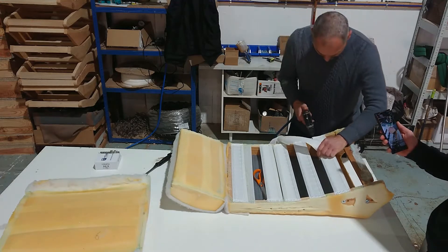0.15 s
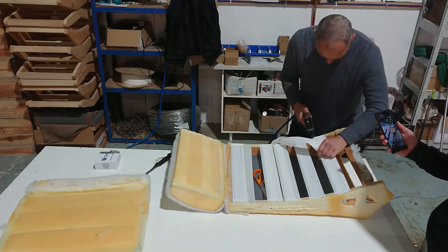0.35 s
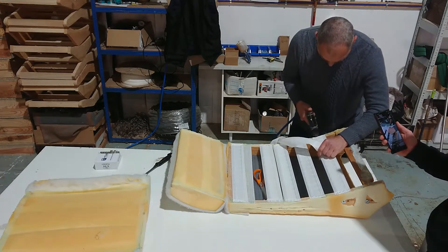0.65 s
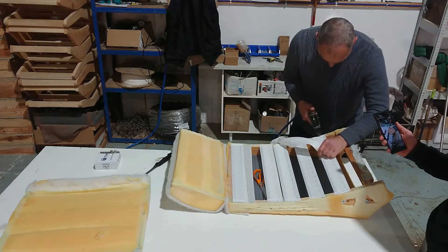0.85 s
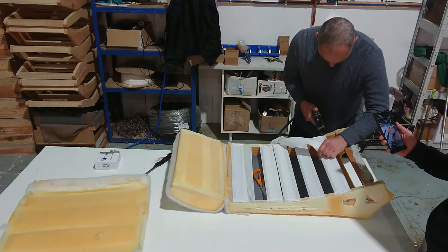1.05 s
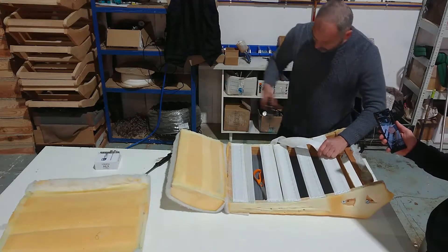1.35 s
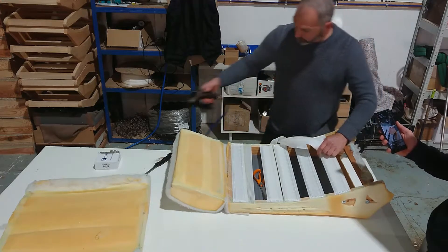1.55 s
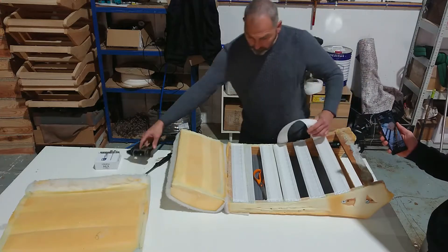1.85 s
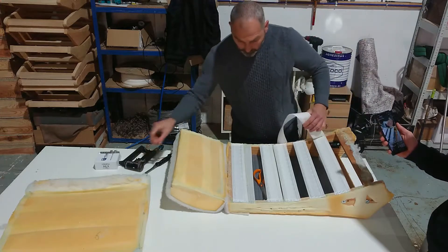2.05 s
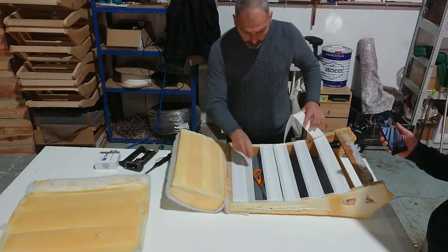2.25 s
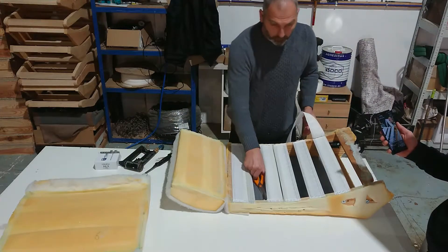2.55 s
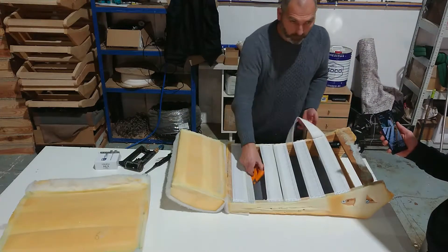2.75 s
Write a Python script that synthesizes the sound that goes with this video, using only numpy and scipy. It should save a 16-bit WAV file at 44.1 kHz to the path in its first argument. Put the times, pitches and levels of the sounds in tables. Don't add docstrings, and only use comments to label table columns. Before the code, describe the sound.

Five loud air stapler cracks with exhaust puffs, then the tool is dropped on a board table, echoing workshop

```python
import sys
import numpy as np
from scipy import signal
from scipy.fft import rfft, irfft
from scipy.io import wavfile

SR = 44100
rng = np.random.default_rng(int(sys.argv[2]) if len(sys.argv) > 2 else 0)


def amplitude_ratio(level_db):
    exponent = np.asarray(level_db, float) / 20
    return 10 ** exponent


def transcribe(signal):
    frames = np.atleast_2d(signal).T
    limited = np.clip(frames, -1, 1)
    pcm = np.round(limited * 32767).astype(np.int16)
    wavfile.write(sys.argv[1], SR, pcm)


N = 127890

# (frequency [Hz], level [dB per Hz])
AIR_SPECTRUM = [(30, -16), (64, -8), (110, -10.5), (500, -16), (2000, -22), (6500, -32.5), (8600, -47.5),
                (16000, -56.5)]
# (time [s], peak [dB])
TOUCHES = [
    (0.449, -14),
]
# (time [s], peak [dB], crack [dB], frame ring [dB])
SHOTS = [
    (0.4824, -4, 0, 7.5),
    (0.763, -4.5, 3, 4),
    (.9780, -6, 3.5, 4),
    (1.159, -5.5, 4, 6),
    (1.2981, -5.5, 3, 3),
]
# (time [s], peak [dB], hiss [dB])
PUFFS = [
    (0.639, -10, 2.5),
    (.8930, -10, 2),
    (1.0880, -12, 2.5),
    (1.2501, -11, 0),
    (1.4201, -11.5, 2),
]
# (time [s], level [dB])
HOSE_BUMPS = [
    (1.529, -34),
    (1.563, -27.5),
    (1.581, -37),
    (2.79, -59),
]
# (time [s], level [dB], hardness [dB], low thud [dB])
DROPS = [(2.1469, -5, -1.5, 3), (2.196, -15, 2, 5.5), (2.2033, -13, 7.5, -0.5), (2.2204, -9, -6, 7.5),
         (2.229, -19.5, 6.5, -2.5), (2.253, -16.5, -3.5, 2.5), (2.2641, -22, -4, 10.5),
         (2.309, -17.5, -7.5, 1), (2.1663, -15.5, -4, -7.5), (2.258, -15, -5.5, 4), (2.276, -20, -2, 8.5),
         (2.289, -17.5, -13, -5), (2.361, -15, -9.5, -6)]

# (frequency [Hz], level [dB], T60 [s])
NOSE_MODES = [(345, -0.5, 0.028), (674, -1.5, 0.034), (1100, 0, 0.055), (1910, -3, .02), (2260, -5, 0.058),
              (3270, -0.5, .012)]
FRAME_MODES = [(475.8, -2, 0.053), (627, -7.5, 0.035), (890, 0, 0.051), (1112, 1, 0.025),
               (1289, -11, 0.061), (2070, -1.5, 0.023), (1732, -12, 0.021), (2355, -2.5, 0.045),
               (102, -12.5, 0.036)]
STEEL_MODES = [(2457, -16.5, 0.011), (3670, 3, 0.0038), (4300, -2, 0.024), (5400, -12.5, .007),
               (6060, -4.5, 0.024), (6750, -3, 0.0075), (6900, 2.5, 0.013), (8030, 1, 0.0082),
               (9100, -10, 0.0049)]
CAP_MODES = [(238.6, -4, 0.015), (399.6, 1.5, 0.02), (600, -8.5, 0.026)]
BENCH_MODES = [(205, -7.5, 0.057), (261, 2, 0.089), (333, 0, 0.063)]
BOARD_LOW_MODES = [(96, -13.5, 0.31), (132, -16, 0.16), (186.4, -2.5, 0.12), (224.6, 1.5, 0.091),
                   (284, -1.5, 0.065), (335, 6, 0.055), (389, 3.5, 0.071), (493.3, 0.5, 0.12),
                   (530.6, -1, .08), (619, -2.5, 0.036)]
BOARD_HIGH_MODES = [(905, -6.5, .05), (965, 3, 0.044), (1080, -1, 0.063), (1130, -19.5, 0.15),
                    (1276, -4, 0.071), (1800, -7, 0.021), (2000, -10, .02), (2430, -14.5, 0.044),
                    (2810, -5, 0.011), (3470, -11, 0.019), (4440, -22, 0.017)]

# (frequency [Hz], level [dB per Hz])
TICK_SPECTRUM = [(300, -17), (2200, -1.5), (3400, 1.5), (4200, -6), (6700, -9.5), (9230, -17), (10500, -25),
                 (16000, -33.5)]
HISS_SPECTRUM = [(1000, -15.5), (4000, -7), (7800, -8), (9400, 7.5), (11500, -13), (16000, 3.5)]
CRACK_SPECTRUM = [(700, -9.5), (1500, -5.5), (3500, 1.5), (5000, 3), (7000, 0.5), (9500, -9.5),
                  (11500, -23), (16000, -6.5)]
BLAST_SPECTRUM = [(300, -8.5), (1000, -0.5), (2300, -1), (4500, -2), (6800, -3.5), (9000, -39.5),
                  (11000, -16), (16000, -18.5)]
EXHAUST_SPECTRUM = [(500, -1), (1500, 5.5), (3000, 2), (6000, 0), (9500, -11), (16000, -9.5)]
# (frequency [Hz], level [dB per Hz])
CLACK_SPECTRUM = [(1000, -1), (1600, -6), (2500, -1), (3300, -7.5), (4600, -14), (5700, -12.5),
                  (7100, -21.5), (10000, -36.5), (16000, -35.5)]
THUD_SPECTRUM = [(70, -16), (180, -2), (450, 0.5), (700, -7), (1050, -3.5), (1600, -13.5), (2800, -22.5),
                 (4500, -30), (16000, -51.5)]

# (frequency [Hz], early level [dB], early T60 [s], late level [dB], late T60 [s], side level [dB])
ROOM = [(81.2, -0.5, 0.9, -16.5, 4.9, -16.5), (253, -13, 0.76, -10.5, 1.63, -14),
        (443, -16.5, .5, -11.5, 1.41, -7.5), (726, -23.5, 0.33, -8.5, 1.66, -4.5),
        (1180, -16, 0.27, -7.5, 1.68, 3), (2100, -12, 0.69, -8.5, 2.24, -2.5),
        (4550, -12.5, 0.77, -10, 2.2, -1), (7080, -16.5, 0.69, -5.5, 1.32, 0),
        (10050, -15.5, 0.58, -11, 0.69, -1), (15000, -9.5, 0.54, -28, 0.68, 1)]
# (frequency [Hz], level difference [dB])
PORTS = [(60, -4.5), (350, -1.5), (800, -2), (5500, -2), (6800, 5.5), (8100, 5), (9200, -12.5), (10500, -8),
         (13000, -3.5)]

MODE_SEND_DB = -5
BOTH = np.ones((2, 1))
MODAL = amplitude_ratio(np.array([[0], [MODE_SEND_DB]]))
SIDE = np.array([[1], [-1]])


def curve(table, hz):
    p = np.array(table, float)
    return np.interp(np.log(np.maximum(hz, 1)), np.log(p[:, 0]), p[:, 1])


def noise(table, size):
    gain = amplitude_ratio(curve(table, np.fft.rfftfreq(size, 1 / SR)))
    x = irfft(rfft(rng.standard_normal(size)) * gain, size)
    return x / x.std()


def click(table, size):
    x = irfft(amplitude_ratio(curve(table, np.fft.rfftfreq(size, 1 / SR))), size)
    x = np.roll(x, 600)
    return x / np.sqrt(np.sum(x ** 2))


def rise(t, length_s):
    return np.clip(t / length_s, 0, 1)


def fall(t, t60):
    return (t >= 0) * np.exp(-np.log(1000) * np.maximum(t, 0) / t60)


def ring(modes, t, scatter_db, push_s):
    m = np.array(modes)
    chance = rng.standard_normal((len(modes), 2))
    hz = m[:, :1] * (1 + 0.008 * chance[:, :1])
    level = amplitude_ratio(m[:, 1:2] + scatter_db * chance[:, 1:])
    x = np.sum(level * np.sin(2 * np.pi * hz * t) * fall(t, m[:, 2:]), axis=0)
    return x * rise(t, push_s) / np.sqrt(len(m))


def add(track, s, x):
    i = int(s * SR)
    track[:, i:i + x.shape[1]] += x[:, :N - i]


def workshop():
    f = np.fft.rfftfreq(N, 1 / SR)
    side_gain = amplitude_ratio(curve(np.array(ROOM)[:, [0, 5]], f))
    side = irfft(rfft(noise(AIR_SPECTRUM, N)) * side_gain, N)
    air = noise(AIR_SPECTRUM, N) + side * SIDE
    hum_hz, width_hz = 64.2, 5.5
    hum = irfft(rfft(rng.standard_normal(N)) * np.exp(-((f - hum_hz) / width_hz) ** 2), N)
    return amplitude_ratio(-55.5) * air + amplitude_ratio(-57) * hum / hum.std()


def nose_touch(t, db):
    tick = amplitude_ratio(-7.5) * rise(t, 0.001) * fall(t, 0.034) * noise(TICK_SPECTRUM, len(t))
    knock = amplitude_ratio(-5) * ring(NOSE_MODES, t, 0.91, 0.00088)
    return BOTH * amplitude_ratio(db) * (tick + knock)


def shot(t, db, crack_db, ring_db):
    hiss = rise(t + 0.011, 0.0021) * fall(np.maximum(t, 0), 0.063) * noise(HISS_SPECTRUM, len(t))
    early = t + 0.002453
    knock = ring(FRAME_MODES, early, 1.5, 0.0006) * fall(early, 0.03)

    rise_s, hold_s, t60_s = 0.0011, 0.0027, 0.0077
    burst = rise(t, rise_s) * fall(np.maximum(t - hold_s, 0), t60_s) * noise(CRACK_SPECTRUM, len(t))
    crack = amplitude_ratio(-4.5) * burst + amplitude_ratio(8) * ring(STEEL_MODES, t, 1.7, rise_s)
    room_crack = amplitude_ratio(14.5) * click(CRACK_SPECTRUM, len(t))
    crack = np.array([amplitude_ratio(crack_db) * crack, room_crack])

    frame = MODAL * amplitude_ratio(ring_db - 3.5) * ring(FRAME_MODES, t - 0.001, 0.8, 0.0015)
    blast = amplitude_ratio(-16.5) * rise(t, 0.0012) * fall(t, 0.24) * noise(BLAST_SPECTRUM, len(t))
    return amplitude_ratio(db) * (amplitude_ratio(-25.5) * hiss + amplitude_ratio(-5.5) * knock + crack + frame + blast)


def puff(t, db, hiss_db):
    lead_s = 0.00312
    u = t - lead_s
    pop = -amplitude_ratio(2) * ring(CAP_MODES, u, 1.0, 0.00087)
    echo = -amplitude_ratio(-15.5) * ring([(201, 0, 0.025)], u - 0.01293, 0.7, 0.0012)
    swell = amplitude_ratio(-9.5) * np.sin(np.pi * t / lead_s) * (t > 0) * (u < 0)
    gas_shape = rise(t + 0.0012, 0.0059) * fall(t + 0.001, 0.095)
    gas = amplitude_ratio(hiss_db - 10.5) * gas_shape * noise(EXHAUST_SPECTRUM, len(t))
    return BOTH * amplitude_ratio(db + 0.5) * (pop + echo + swell + gas)


def stapler():
    out = np.zeros((2, N))
    t = np.arange(16384) / SR - 0.01
    for s, db in TOUCHES:
        add(out, s + t[0], nose_touch(t, db))
    for s, db, crack_db, ring_db in SHOTS:
        add(out, s + t[0], shot(t, db, crack_db, ring_db))
    for s, db, hiss_db in PUFFS:
        add(out, s + t[0], puff(t, db, hiss_db))
    return out


def hose_bump(t, db):
    return BOTH * amplitude_ratio(db) * ring(BENCH_MODES, t, 1.6, 0.0036)


def landing(t, db, hard_db, thud_db):
    push_s = 0.0009
    low = -amplitude_ratio(thud_db) * ring(BOARD_LOW_MODES, t, 2.5, 3 * push_s)
    high = amplitude_ratio(hard_db + 5.5) * ring(BOARD_HIGH_MODES, t, 1.9, push_s)
    clack_shape = rise(t + 0.0023, 0.0015) * fall(t + 0.00068, 0.032)
    clack = amplitude_ratio(hard_db - 6) * clack_shape * noise(CLACK_SPECTRUM, len(t))
    thud = amplitude_ratio(22) * click(THUD_SPECTRUM, len(t))
    send = amplitude_ratio(MODE_SEND_DB) * (low + high) + thud + amplitude_ratio(-6.5) * clack
    return amplitude_ratio(db) * np.array([low + high + clack, send])


def table():
    out = np.zeros((2, N))
    t = np.arange(16384) / SR - 0.012
    for s, db in HOSE_BUMPS:
        add(out, s + t[0], hose_bump(t, db))
    for s, db, hard_db, thud_db in DROPS:
        add(out, s + t[0], landing(t, db, hard_db, thud_db))
    return out


def room():
    size = 2 ** 17
    t = np.arange(size) / SR - 0.0068
    f, r = np.fft.rfftfreq(size, 1 / SR), np.array(ROOM)
    sparse_db = 3.5 * np.exp(-np.maximum(t, 0) / 0.031)
    spikes = amplitude_ratio(sparse_db * rng.exponential(size=size))
    seeds = rfft(spikes * rng.standard_normal((2, size)) * (t > 0))
    out = np.zeros((2, size))
    for hz in 40 * 2 ** np.arange(0, 9, 0.5):
        early_db, early_t60, late_db, late_t60, side_db = (curve(r[:, [0, k]], hz) for k in range(1, 6))
        octaves = np.log2(np.maximum(f, 1) / hz)
        band = irfft(seeds * np.cos(np.pi * np.clip(octaves, -0.5, 0.5)) ** 2, size)
        early = amplitude_ratio(early_db) * fall(t, early_t60) / np.sqrt(early_t60)
        late = amplitude_ratio(late_db) * fall(t, late_t60) / np.sqrt(late_t60)
        out += (early + late) * (band[0] + amplitude_ratio(side_db) * band[1] * SIDE)
    return out / np.sqrt(SR / 14)


def place(x, lag_s, pan_db, wet_db, walls):
    x = signal.sosfilt(signal.butter(4, 71, "high", fs=SR, output="sos"), x)
    f, t = np.fft.rfftfreq(N, 1 / SR), np.arange(512) / SR
    scatter = rng.standard_normal((2, len(t))) * fall(t - 0.0002, 0.007)
    scatter = scatter / np.sqrt(np.sum(scatter ** 2, axis=1, keepdims=True))
    scatter = rfft(scatter, N) * f ** 2 / (f ** 2 + 2400 ** 2)
    near = 1 + amplitude_ratio(1) * scatter
    near = near / (np.abs(near) + 0.05) ** 0.9
    path = np.exp(-1j * np.pi * f * lag_s * SIDE) * near
    direct = irfft(rfft(x[0]) * path, N) * amplitude_ratio(pan_db * SIDE / 2)
    wet = signal.fftconvolve(x[1:], walls)[:, :N]
    return direct + amplitude_ratio(wet_db) * wet


def scene():
    walls = room()
    gun = place(stapler(), lag_s=0.00009, pan_db=-0.7, wet_db=0, walls=walls)
    board = place(table(), lag_s=-0.00014, pan_db=-0.1, wet_db=-2.5, walls=walls)
    return workshop() + gun + board


def low_pass(x):
    return signal.sosfilt(signal.butter(12, 16980, fs=SR, output="sos"), x)


def record(dry):
    tilt_db = curve(PORTS, np.fft.rfftfreq(N, 1 / SR)) / 2
    x = irfft(rfft(dry) * amplitude_ratio(tilt_db * SIDE), N)
    x = x + amplitude_ratio(-97) * np.diff(rng.standard_normal((2, N + 1)))
    x = signal.sosfilt(signal.ellip(8, 0.3, 40, 15700, fs=SR, output="sos"), x)
    ceiling = 0.78
    x = x / (1 + np.abs(x / ceiling) ** 6) ** (1 / 6)
    return low_pass(x)


dry = scene()
out = record(dry)
transcribe(out)
```